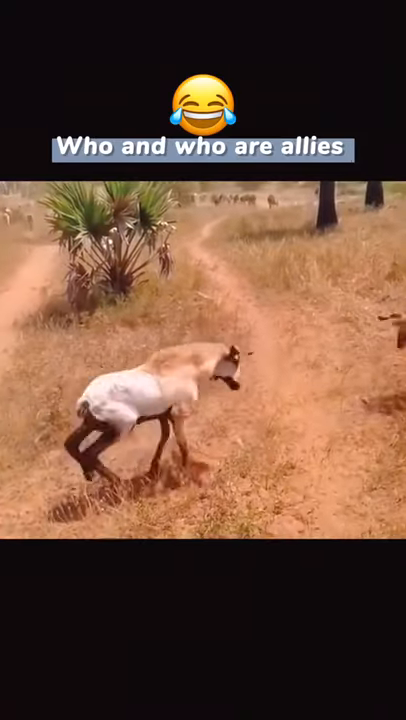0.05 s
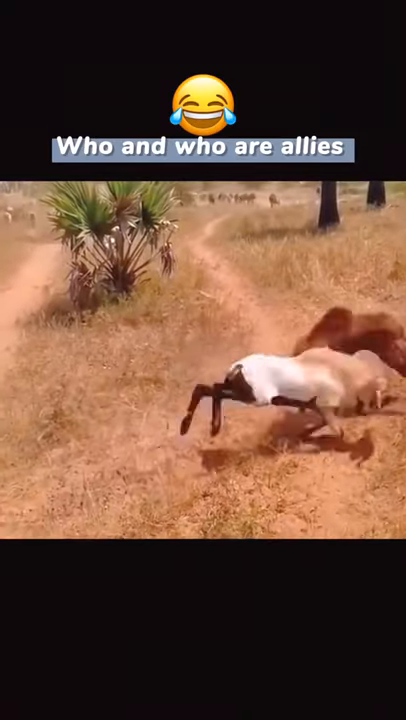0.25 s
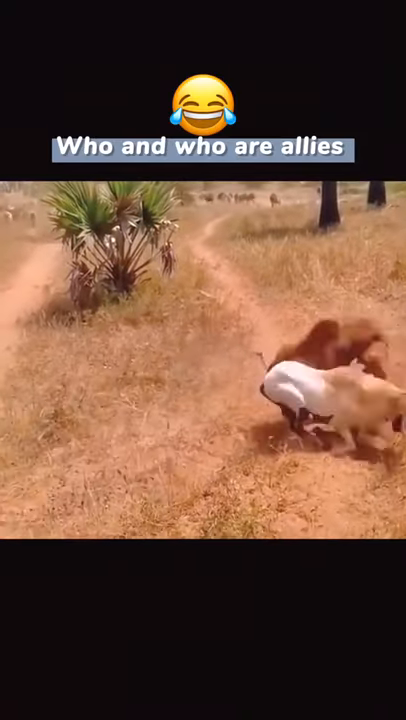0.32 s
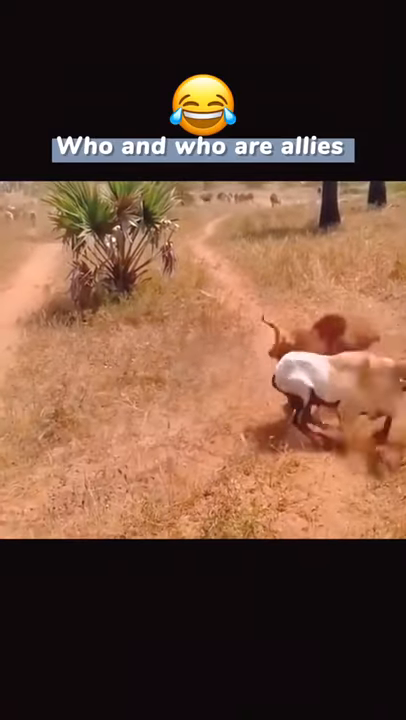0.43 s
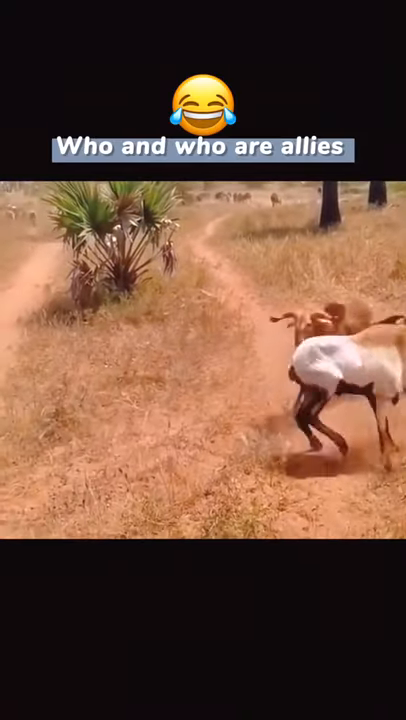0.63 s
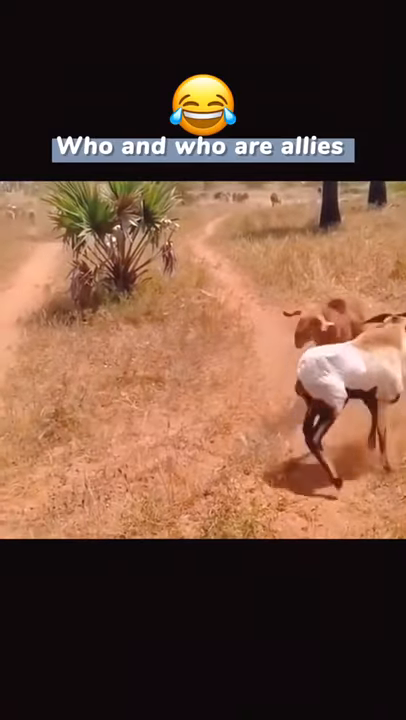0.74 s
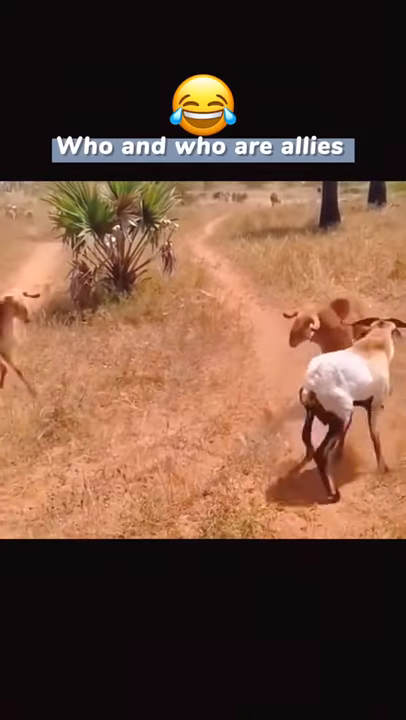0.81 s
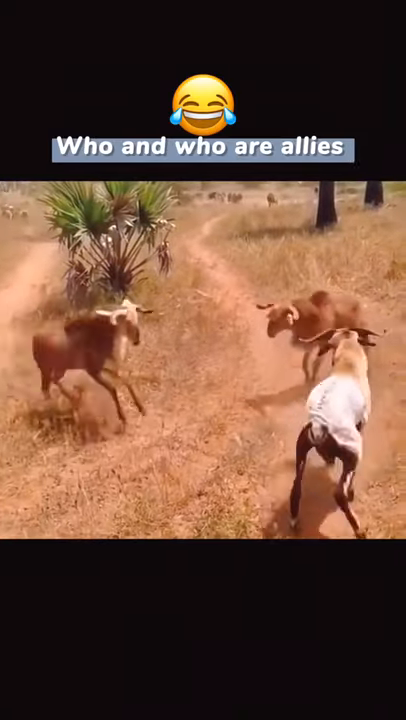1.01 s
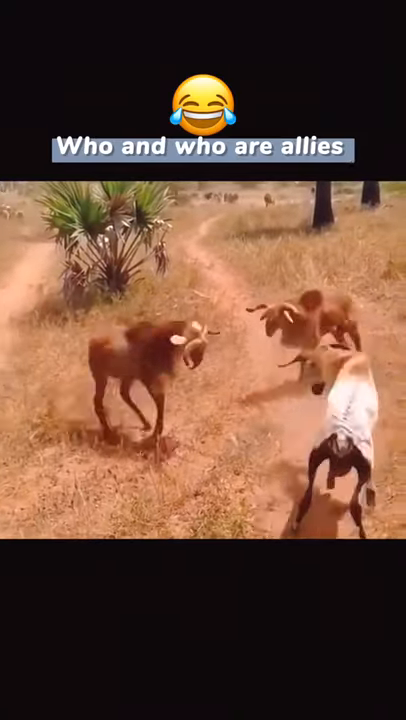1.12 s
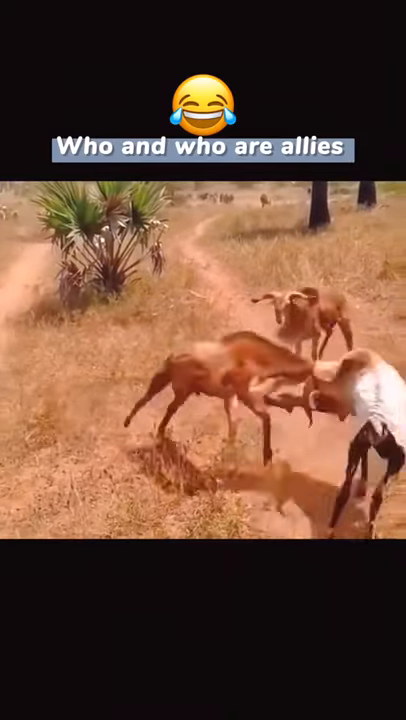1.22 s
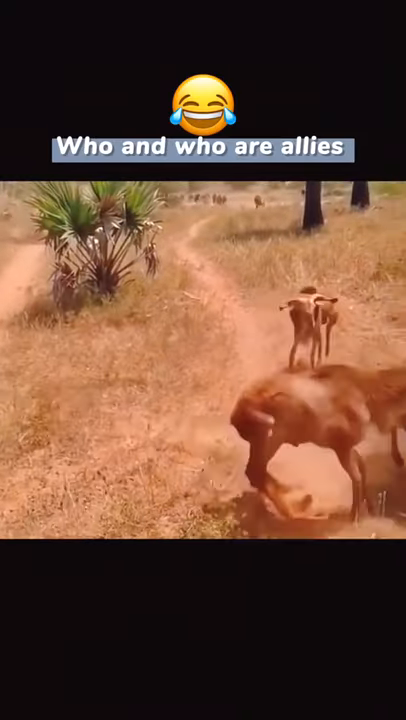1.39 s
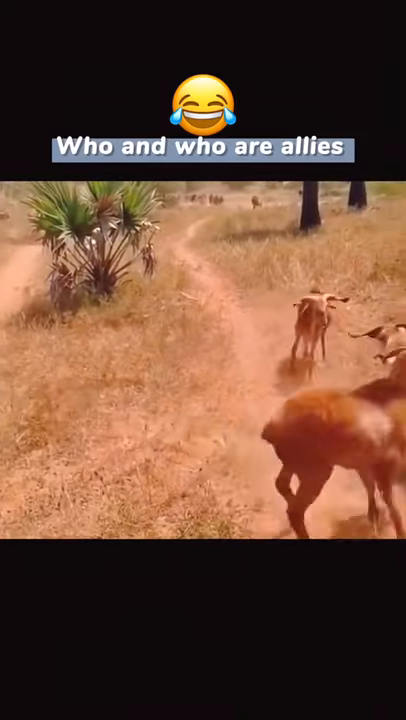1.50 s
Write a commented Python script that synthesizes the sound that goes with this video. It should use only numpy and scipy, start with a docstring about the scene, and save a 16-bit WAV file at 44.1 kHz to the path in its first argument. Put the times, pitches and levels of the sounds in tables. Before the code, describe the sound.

Rams butt heads twice, about a second apart, each clash a sharp crack of horn with a hollow knock and a thud. Hooves thump and scuff through dry grass in an open field while wind rumbles on the microphone.

```python
"""Two pairs of rams butt heads, one clash each, heard on a dry field through one microphone.
Each clash is a crack of horn and a short, hollow knock of skulls, then a thud of the bodies.
Hooves thump and scuff through grit and dry grass, and the horns rub with a brief squeak after the
second clash. Wind rumbles and thumps on the microphone over a faint hiss of grass."""
import sys
import numpy as np
from scipy import signal
from scipy.fft import rfft, irfft, next_fast_len
from scipy.io import wavfile
from scipy.ndimage import uniform_filter1d, map_coordinates

SR = 44100
rng = np.random.default_rng(int(sys.argv[2]) if len(sys.argv) > 2 else 0)


def materialize(psi):
    """Save the field psi as 16-bit PCM at rate SR to the path in sys.argv[1].

    A 1-D psi becomes a single channel; in a 2-D psi each row is a channel.
    """
    bounded = np.clip(np.atleast_2d(psi).T, -1, 1)
    quanta = np.round(bounded * 32767).astype(np.int16)
    wavfile.write(sys.argv[1], SR, quanta)


N = 68355


def amp(db):
    """Decibels to gain."""
    return 10 ** (np.asarray(db) / 20)


def unit(x):
    """Scaled to rms 1."""
    return x / np.sqrt(np.mean(x ** 2) + 1e-20)


def since(start):
    """Seconds after a moment, zero before it."""
    return np.maximum(np.arange(N) / SR - start, 0)


def curve(rows):
    """(seconds, value) points joined, one value per sample."""
    return np.interp(since(0), *np.transpose(rows))


def wobble(rate):
    """A smooth random curve, rate knots a second."""
    return map_coordinates(rng.standard_normal(N), [since(0) * rate + 2])


def swell(start, rise, t60, hold=0):
    """Linear attack, hold, then a fall of 60 dB every t60 seconds."""
    return np.minimum(since(start) / rise, 1) * amp(-60 * since(start + rise + hold) / t60)


def colour(x, spectrum):
    """x shaped by (Hz, dB) points, at rms 1."""
    size = next_fast_len(N + 8192)
    hz, db = np.transpose(spectrum)
    gain = amp(np.interp(np.log(np.fft.rfftfreq(size, 1 / SR) + 1), np.log(hz), db))
    return unit(irfft(rfft(x, size) * gain, size)[:N])


def noise(spectrum):
    """Coloured noise of rms 1."""
    return colour(rng.standard_normal(N), spectrum)


def patchy(x, depth_db):
    """x with drifting patches of stronger and weaker bands."""
    bands = signal.stft(x, nperseg=1024)[2]
    patches = uniform_filter1d(rng.standard_normal(bands.shape), size=5, axis=0)
    patches = unit(uniform_filter1d(patches, size=7, axis=1))
    return unit(signal.istft(bands * amp(depth_db * patches), nperseg=1024)[1][:N])


def gritty(spectrum, grains_per_s=1000, grit_db=-7.5):
    """Coloured, uneven noise with tiny clicks of grit in it."""
    grains = (rng.random(N) < grains_per_s / SR) * rng.standard_normal(N)
    hiss = patchy(rng.standard_normal(N), depth_db=4.5)
    return colour(hiss + amp(grit_db) * unit(grains), spectrum)


def knock(start, hz, db, rise):
    """One heavily damped mode that peaks after rise seconds and dies quickly."""
    t = since(start)
    return amp(db) * t / rise * np.exp(1 - t / rise) * np.sin(2 * np.pi * hz * t)


# Gusts at the microphone. Each row: time in seconds, level in dB.
GUSTS = [(0, -53), (.14, -54.5), (.18, -59.5), (.24, -47.5), (.31, -65), (.37, -49.5), (.44, -42.5),
         (.51, -51.5), (.58, -52), (.67, -42), (.77, -51.5), (.83, -47.5), (.93, -44), (1.0, -43.5),
         (1.06, -50.5), (1.13, -50.5), (1.25, -48.5), (1.35, -43.5), (1.4, -55), (1.55, -64)]
# Their rumble. Each row: frequency in Hz, relative level in dB.
WIND_SPECTRUM = [(15, -4.5), (28, -0.5), (45, 2), (75, -5.5), (110, -3.5), (160, -16), (250, -23),
                 (400, -35), (800, -47), (2000, -100)]


def wind():
    """Gusts buffet the microphone with a low rumble."""
    return amp(curve(GUSTS)) * noise(WIND_SPECTRUM)


# The field's rustle and the fizz above it. Each row: time in seconds, level in dB.
RUSTLE_LEVELS = [(0, -61.5), (.08, -56.5), (.18, -57), (.3, -54), (.45, -63), (.6, -60), (.72, -65.5),
                 (.78, -60), (.92, -64.5), (1.0, -59.5), (1.1, -58.5), (1.19, -59.5), (1.3, -57),
                 (1.44, -58), (1.55, -57)]
FIZZ_LEVELS = [(0, -67), (.04, -63), (.15, -62.5), (.2, -70), (.235, -60), (.314, -54), (.37, -58.5),
               (.41, -71), (.55, -67), (.72, -75), (.78, -71), (.88, -76), (.96, -71), (1.03, -62.5),
               (1.09, -70.5), (1.155, -59.5), (1.21, -70), (1.29, -69), (1.34, -62), (1.55, -65)]
# Their colours. Each row: frequency in Hz, relative level in dB.
RUSTLE_SPECTRUM = [(150, 2), (250, -1.5), (434, -14), (620, -7.5), (760, -5), (1120, -7), (1760, -6),
                   (2400, -6), (3510, -12.5), (5000, -8), (5890, -11.5), (7640, -8), (10400, -14.5),
                   (13700, -31), (15500, -28)]
FIZZ_SPECTRUM = [(7000, -35), (10000, -10), (12000, -3), (13800, 0), (14500, -2), (14900, -12),
                 (16000, -15)]


def grass():
    """Dry grass rustles in the wind, with a fine fizz in the top treble."""
    flutter_db = 1.1 * wobble(rate=35)
    rustle = amp(curve(RUSTLE_LEVELS) + flutter_db) * gritty(RUSTLE_SPECTRUM)
    fizz = amp(curve(FIZZ_LEVELS)) * gritty(FIZZ_SPECTRUM)
    return rustle + fizz


# One distant tone, then two of rubbing horn. Each row: start in seconds, level in dB, pitch in Hz,
# rise, hold and t60 in seconds, waver as a share of the pitch.
SQUEAKS = [(0, -61, 695, .005, 0.043, .08, 0.026), (1.267, -59.5, 742, 0.016, 0.04, 0.046, 0.081),
           (1.325, -44, 805, 0.0013, 0.01, 0.025, 0.045)]


def squeaks():
    """A faint tone wavers far off; later the horns rub together and squeak."""
    out = np.zeros(N)
    for start, db, hz, rise, hold, t60, waver in SQUEAKS:
        pitch = hz * (1 + waver * wobble(rate=250))
        tone = unit(np.sin(2 * np.pi * np.cumsum(pitch) / SR))
        flutter_db = 3.5 * wobble(rate=180)
        out += amp(db + flutter_db) * swell(start, rise, t60, hold) * tone
    return out


# Scrapes on the ground. Each row: start in seconds, level in dB, rise and t60 in seconds.
HOOF_SCUFFS = [(0.118, -56, 0.02, .15), (0.195, -42.5, 0.017, .04), (.215, -45, 0.022, 0.11),
               (.337, -54.5, 0.028, 0.19), (0.746, -64, 0.011, 0.51), (0.961, -64, 0.0075, 0.34),
               (1.214, -47, 0.021, 0.15), (1.257, -54, 0.014, 0.43), (1.332, -43.5, 0.026, 0.05),
               (1.39, -68, 0.016, 0.074)]
# Scraped dirt. Each row: frequency in Hz, relative level in dB.
DIRT_SPECTRUM = [(100, -21), (250, 0.5), (400, -2), (500, -1.5), (620, 1), (800, 2.5), (1200, -2.5),
                 (2100, -2.5), (3500, -9), (6000, -19), (9000, -19), (16000, -37)]


def scuffs():
    """Hooves scrape through the gritty dirt of the field."""
    envelope = sum(amp(db) * swell(start, rise, t60) for start, db, rise, t60 in HOOF_SCUFFS)
    return envelope * gritty(DIRT_SPECTRUM)


# One blow for each pair. Each row: start in seconds, crack level in dB, crack t60 in seconds,
# snap level in dB, after-ring gain in dB, body gain in dB, body lag in seconds, body pitch ratio.
BLOWS = [(0.2089, -28, 0.035, -44.5, 3.5, -26, 0.0044, 0.94),
         (1.2451, -40, 0.054, -46, -12, -35, 0.0035, 0.88)]
# Horns and skulls of each pair. Each row: frequency in Hz, level in dB, seconds to the peak.
FIRST_PAIR_MODES = [(628, -30.5, 0.0044), (711, -19.5, .0022), (945, -20, 0.0014), (1050, -22, 0.0019),
                    (1135, -31, .002), (1396, -32.5, 0.0028), (1610, -32, 0.0017), (1812, -19.5, 0.0014),
                    (2440, -31.5, 0.0014), (2760, -31, 0.0017), (3135, -43.5, 0.0033), (4450, -27.5, .0007),
                    (6080, -37.5, 0.0019), (7700, -35, 0.00037)]
SECOND_PAIR_MODES = [(643, -34.5, 0.0039), (941, -31.5, 0.0024), (1045, -34, 0.0026), (1220, -39.5, 0.0041),
                     (1415, -31, 0.0014), (1552, -39, .003), (1960, -36.5, 0.0029), (2180, -33, 0.0019),
                     (2700, -48, 0.003)]
# The bodies behind the blow. Each row: base frequency in Hz, relative level in dB, seconds to the peak.
BODY_MODES = [(77, -7.5, 0.0085), (170, 2, 0.0037), (326, -6.5, 0.0035)]
# The broad crack and its bright snap. Each row: frequency in Hz, relative level in dB.
CRACK_SPECTRUM = [(200, -21), (500, -17), (800, 1), (2000, 4), (3500, -4), (5500, -9), (8000, -6),
                  (11000, -12.5), (14000, -15), (16000, -40)]
SNAP_SPECTRUM = [(3000, -25), (5000, 4), (8000, 5), (10500, -19), (13500, -3), (16000, -13)]
# The horn's faint after-ring. Each row: frequency in Hz, relative level in dB, t60 in seconds.
HORN_MODES = [(745, -70, 0.039), (1192, -32, 0.047), (1616, -37, 0.088), (1700, -35.5, 0.046),
              (2190, -50, 0.14), (2514, -47.5, 0.16), (2910, -65.5, .12), (3090, -62.5, 0.34),
              (3350, -51, 0.18), (3780, -55, 0.124)]


def clashes(attack_s=0.002, lag_cycles=0.94):
    """Horn cracks on horn and rings, the skulls knock, and the bodies thud just after."""
    out = np.zeros(N)
    for blow, head_modes in zip(BLOWS, (FIRST_PAIR_MODES, SECOND_PAIR_MODES)):
        start, crack_db, crack_t60, snap_db, ring_db, body_db, body_lag, body_pitch = blow
        for hz, db, rise in head_modes:
            out += knock(start + lag_cycles / hz, hz, db, rise)  # low modes start later
        for hz, db, rise in BODY_MODES:
            out += knock(start + body_lag, hz * body_pitch, body_db + db, rise)
        crack = patchy(noise(CRACK_SPECTRUM), depth_db=2)
        out += amp(crack_db) * swell(start, attack_s, crack_t60) * crack
        out += amp(snap_db) * swell(start, attack_s, t60=0.068) * noise(SNAP_SPECTRUM)
        for hz, db, t60 in HORN_MODES:
            tone = np.sin(2 * np.pi * (hz * since(start) + rng.random()))
            out += amp(ring_db + db) * swell(start, attack_s, t60) * tone
    return out


# Kicked-up sand. Each row: start in seconds, level in dB, rise and t60 in seconds.
SAND_SPRAYS = [(.215, -56, .01, 0.3), (0.746, -65.5, 0.015, 0.55), (.964, -60.5, 0.0047, 0.1),
               (1.324, -54.5, 0.0093, 0.53)]
# Its hiss. Each row: frequency in Hz, relative level in dB.
SAND_SPECTRUM = [(1500, -47), (3000, -1), (4300, 4.5), (6000, -7), (8500, -1.5), (11000, -8), (16000, -30)]


def sprays():
    """Hooves throw sand and dry grass in short, bright sprays."""
    envelope = sum(amp(db) * swell(start, rise, t60) for start, db, rise, t60 in SAND_SPRAYS)
    return envelope * gritty(SAND_SPECTRUM)


# Hoof steps and, below 80 Hz, thumps of wind. Each row: start in seconds, level in dB, pitch in Hz.
THUMPS = [(0.359, -50, 314), (0.396, -42, 131), (.402, -48.5, 320), (0.411, -36, 52), (.525, -42, 139),
          (.528, -50.5, 253), (.622, -37, 46.6), (0.646, -52.5, 184), (0.714, -46, 71),
          (0.802, -36.5, 45.9), (0.829, -57, 128), (.885, -39.5, 76.5), (0.964, -61, 150),
          (1.003, -44.5, 289), (1.34, -46.5, 239)]


def steps_and_buffets(rise_cycles=0.79):
    """Hoof steps and low thumps of wind on the microphone, each dying within a few cycles."""
    return sum(knock(start, hz, db, rise_cycles / hz) for start, db, hz in THUMPS)


def scene():
    """The rams and the field around them at one microphone, with no echo."""
    return (wind() + grass() + squeaks() + scuffs() + clashes() + sprays() + steps_and_buffets())[None]


def record(dry, top_hz=15800):
    """The recorder keeps nothing above its band limit."""
    size = next_fast_len(N + 8192)
    passband = np.fft.rfftfreq(size, 1 / SR) < top_hz
    return irfft(rfft(dry, size) * passband, size)[:, :N]


dry = scene()
out = record(dry)
materialize(out)
```